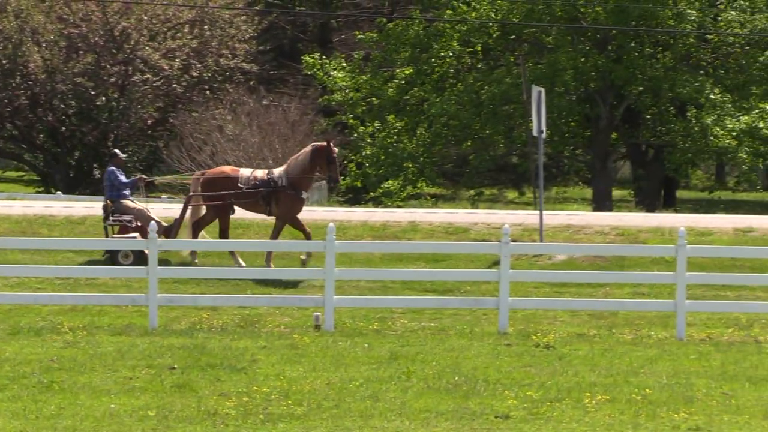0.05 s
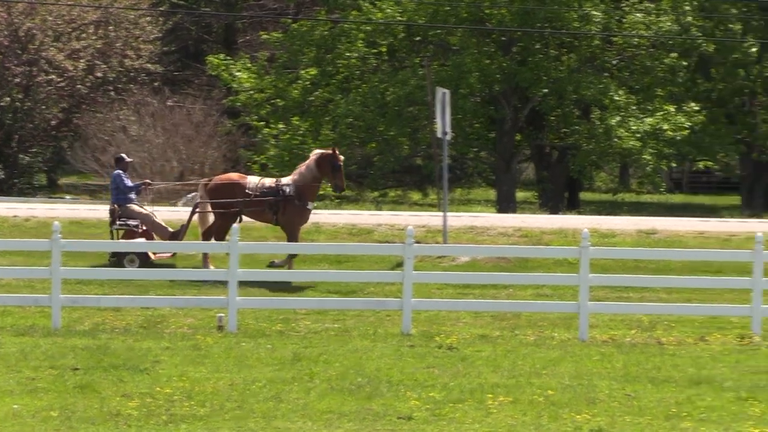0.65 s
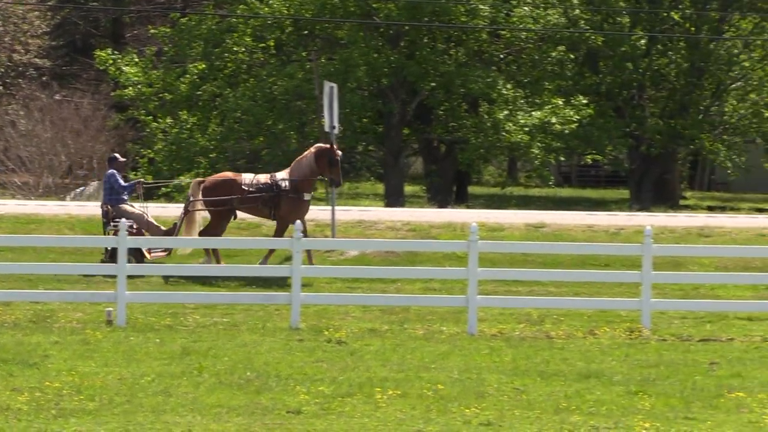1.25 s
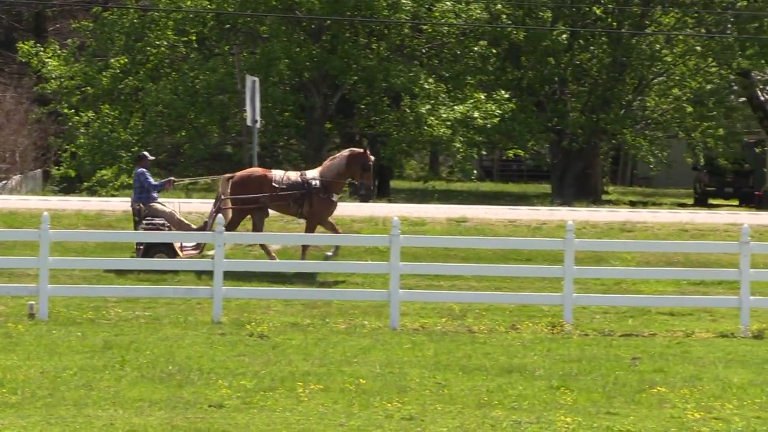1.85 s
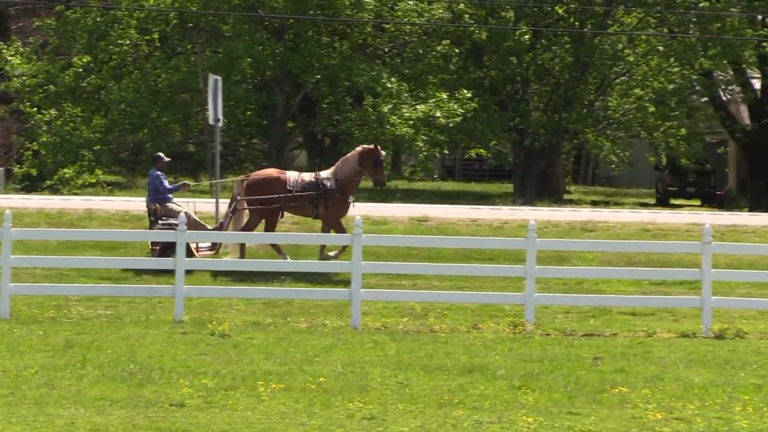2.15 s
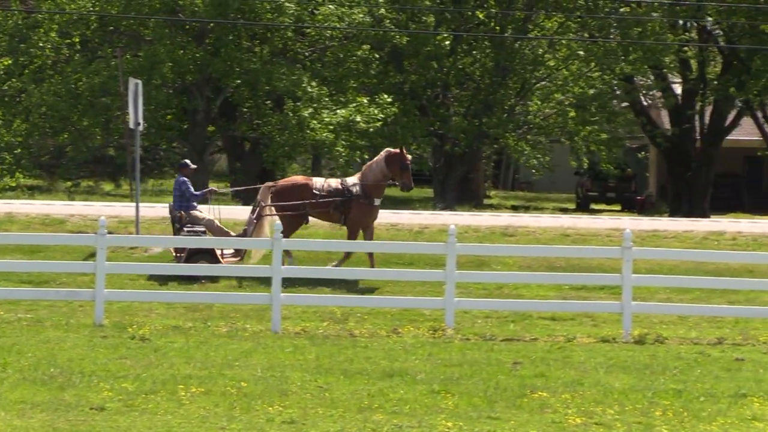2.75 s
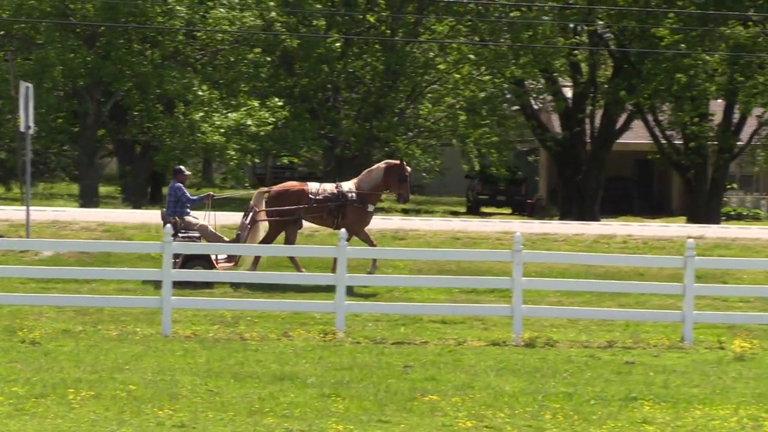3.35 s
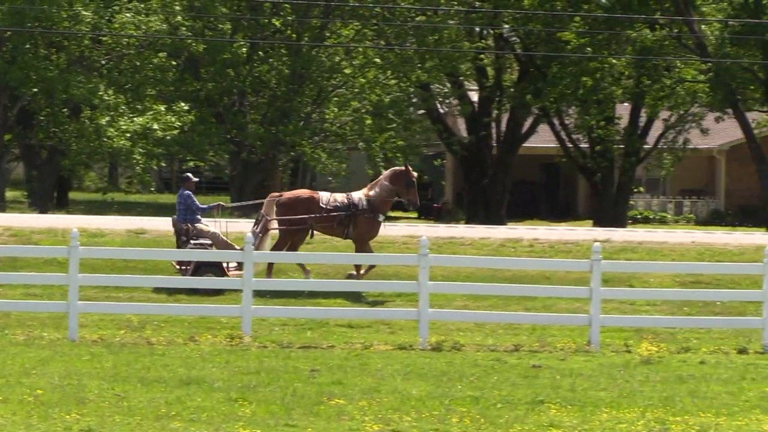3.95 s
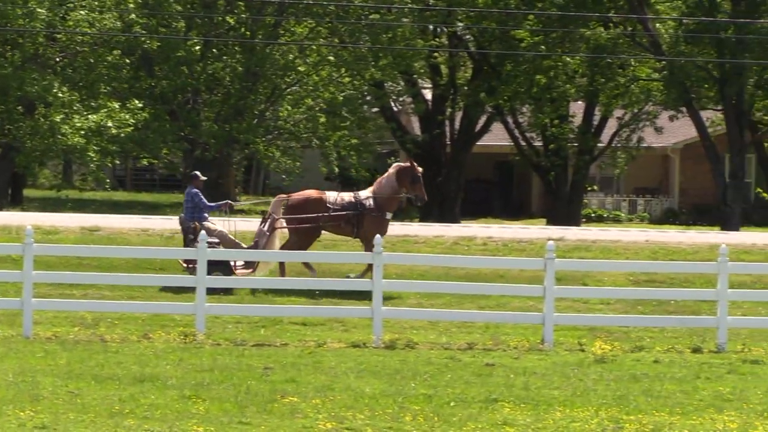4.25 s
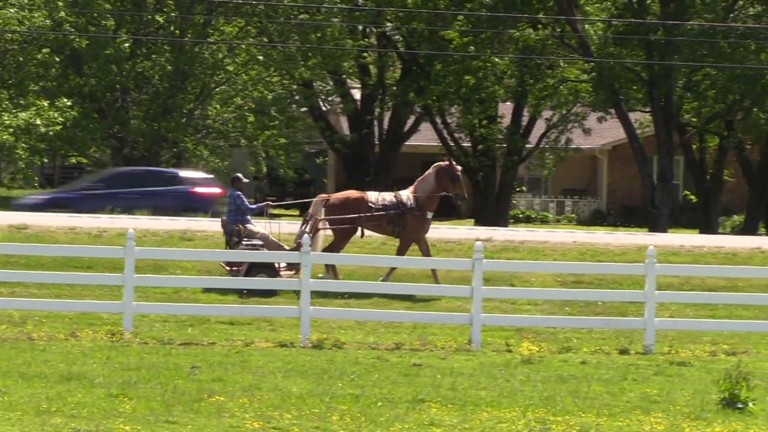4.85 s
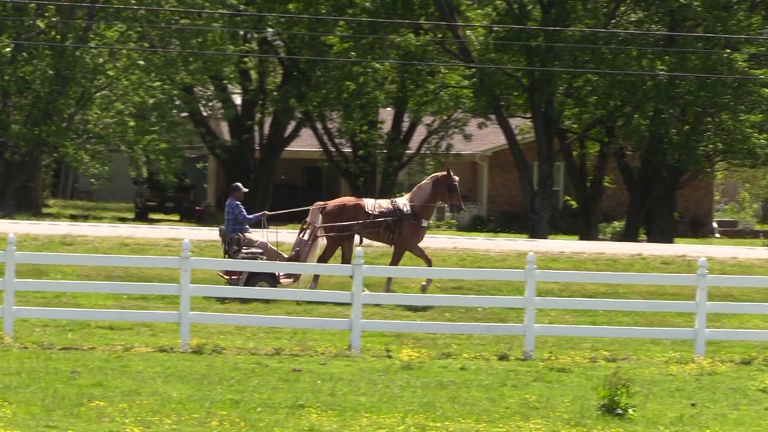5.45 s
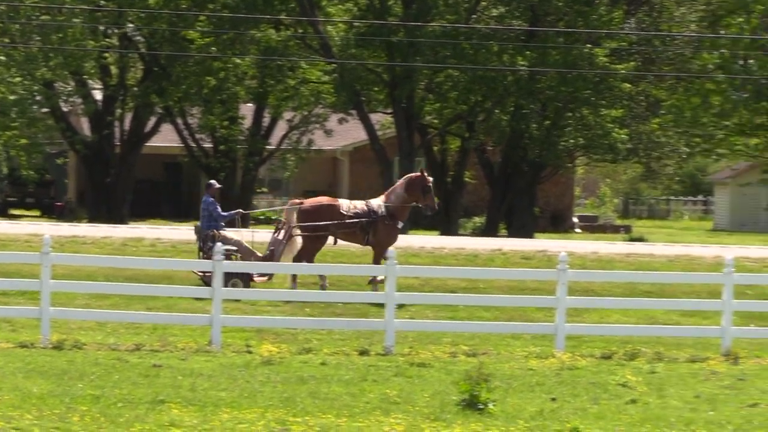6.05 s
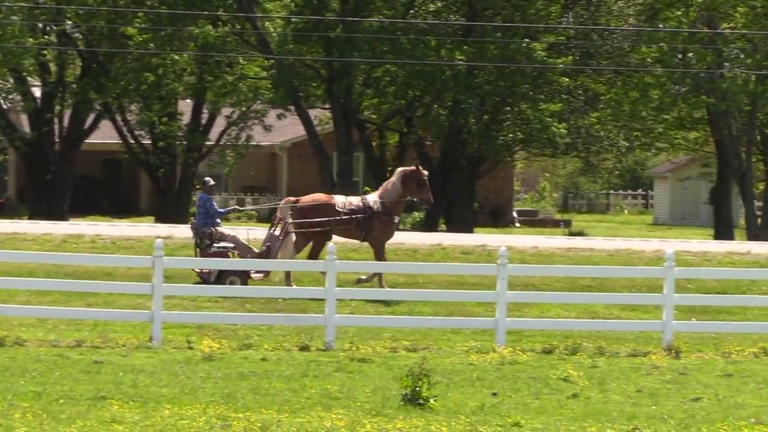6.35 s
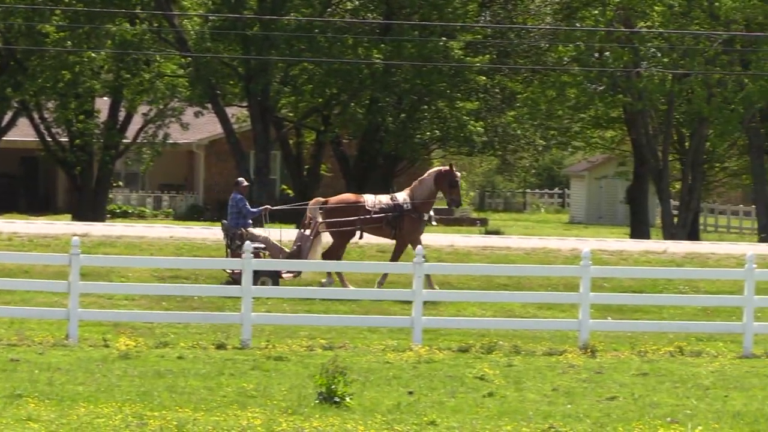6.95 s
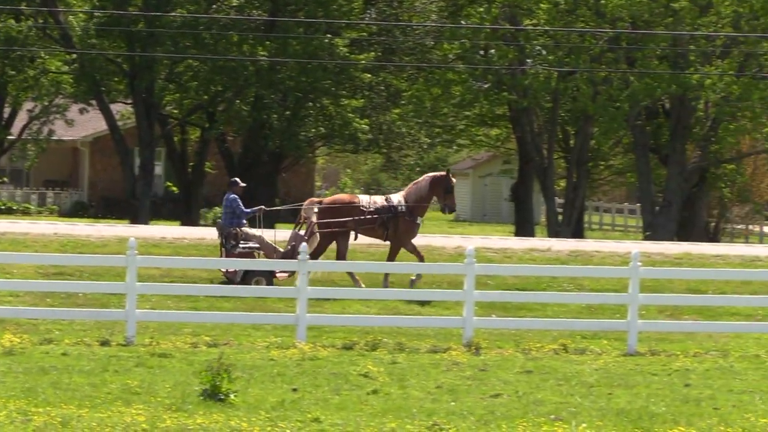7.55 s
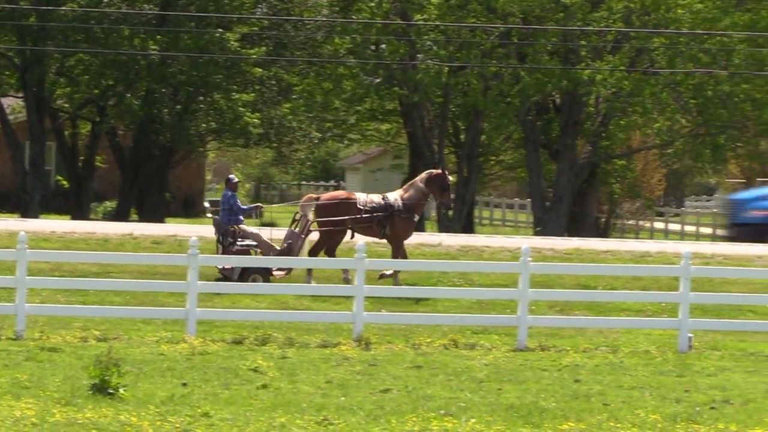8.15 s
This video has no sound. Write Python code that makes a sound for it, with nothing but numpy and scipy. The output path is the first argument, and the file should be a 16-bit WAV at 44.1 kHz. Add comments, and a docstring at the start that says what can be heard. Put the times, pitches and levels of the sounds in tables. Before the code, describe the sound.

Gusty wind rumbles on the microphone in a roadside field for about eight seconds, rising and falling unevenly. Sharp little slaps of air come at the very start and around 0.6 seconds. The strongest gusts sputter and crackle between 2.6 and 4 seconds, with a dry snap near 3.1, and further gusts push in around 6.5 and 7.9 seconds. Cars pass on a road some way off: their tyre roar swells most from 3.3 to 4 seconds, returns around 5.5 to 6.5, and rises again near the end, over a low engine drone that slowly grows. A small bird on the left gives a quick two-part whistled chirp at about 0.5, 2.2 and 3.6 seconds, then repeats it a little more than once a second. Faint thin far calls and scattered dry ticks lie over a soft, steady hiss of distant leaves.

```python
"""Gusty wind on a stereo microphone in a roadside field: eddies make a low rumble, and the strongest
gusts sputter and slap. Cars pass on a road some way off, their tyre roar swelling and fading over
the drone of far engines. A small bird to the left repeats a quick two-part chirp of whistled notes.
Thin far calls and dry ticks lie over a steady hiss of distant leaves and the microphone itself."""
import sys
import numpy as np
from scipy import signal
from scipy.fft import rfft, irfft
from scipy.io import wavfile
from scipy.ndimage import uniform_filter1d

SR = 44100
rng = np.random.default_rng(int(sys.argv[2]) if len(sys.argv) > 2 else 0)


def digitize_waveform(pressure):
    """Quantize a signal to 16-bit integers and store it at the path in sys.argv[1].

    Rows of a 2-D input are taken as channels; values are limited to [-1, 1].
    """
    field = np.atleast_2d(pressure).T
    bounded = np.clip(field, -1, 1)
    quanta = np.round(bounded * 32767).astype(np.int16)
    wavfile.write(sys.argv[1], SR, quanta)


N = 362502
FRAME, HOP = 1024, 256  # samples
BINS = np.fft.rfftfreq(FRAME, 1 / SR)
FRAME_TIMES = np.arange(N // HOP + 2) * HOP / SR
TIMES = np.arange(N) / SR

# far leaves and microphone hiss: frequency_hz, density_db
HISS_SPECTRUM = [(500, -2.5), (3000, 5), (4500, 6), (5600, 0.5), (7500, -3), (10000, -8), (13400, -13)]
# dips in the background after two hard gusts: deepest_s, gain_db, sink_s, recovery_s
BACKGROUND_DIPS = [(3.25, -3, 0.19, 0.33), (4.0, -3, 0.16, 0.43)]
# dry ticks and snaps, and one sharp click in the gust's sputter at 3.117 s: start_s, level_db, centre_hz,
# decay_s
DRY_TICKS = [(.066, -36.5, 2660, 0.012), (.276, -55, 5000, .006), (.278, -63, 8100, .012),
             (0.8455, -47, 5000, .0012), (2.085, -62, 7500, .025), (2.505, -60, 7000, .014),
             (3.117, -29, 3100, 0.0032), (3.2272, -61, 8000, .005), (5.5574, -45, 5000, 0.0014),
             (5.64, -60, 7500, .005), (6.9098, -49, 5000, .0015), (7.2196, -56, 5200, .007),
             (7.6327, -49, 5200, .0012), (8.0517, -46, 5100, .0012)]
# thin calls from far off: start_s, length_s, pitch_hz, level_db, mid_sag_ratio
FAR_CALLS = [(0.18, .028, 7750, -65, .005), (.875, .085, 4300, -58, .033), (4.245, .06, 6460, -64, .003),
             (4.35, .05, 6480, -68, .003), (4.56, 0.21, 4300, -65, 0.012)]
# notes of the bird's two chirps: delay_s, length_s, first_hz, middle_hz, last_hz, gain_db, trill_depth_hz
SLUR = [(-.013, 0.0075, 5450, 5640, 5450, -10, 0), (0, 0.0238, 4310, 4220, 3790, -1, 0),
        (0.024, 0.015, 3250, 3620, 3920, -4, 0), (0.05, .026, 3450, 3750, 4450, 0, 0),
        (.072, 0.0295, 3440, 3225, 3150, 3, 0)]
WARBLE = [(-.002, .016, 3600, 4200, 4350, -3, 0), (.013, 0.02, 4450, 4270, 4230, 2.5, 422.5),
          (.036, 0.0216, 3130, 3600, 4050, 1, 0), (.056, .03, 3950, 3550, 2950, 6.5, 389)]
# chirps from the left: start_s, level_db, pitch_ratio, notes
BIRD_CHIRPS = [(.466, -46, 1.02, SLUR), (2.211, -45.5, 0.97, SLUR), (3.583, -44, 1.0, SLUR),
               (4.305, -43.5, 0.96, SLUR), (5.157, -45, 0.96, WARBLE), (5.877, -40.5, 0.99, SLUR),
               (6.646, -47.5, 1.0, SLUR), (7.493, -44.5, 0.95, WARBLE), (8.165, -40, 0.95, SLUR)]
# far engines: frequency_hz, density_db
ENGINE_SPECTRUM = [(20, -65), (40, -32), (62, -21), (90, -8.5), (180, 5), (300, -7.5), (450, -8.5),
                   (750, -7.5), (1100, -11), (2500, -49)]
# tyre roar as it reaches the field: frequency_hz, density_db
TYRE_SPECTRUM = [(300, -31), (520, -6.5), (750, -2.5), (1050, -3), (1270, 0), (1450, -3), (1720, -0.5),
                 (2150, -4), (2750, -6), (3300, -14), (3900, -20.5), (5500, -49.5)]
# how alike the road sounds at the microphone's two ports: frequency_hz, correlation_ratio
ROAD_LIKENESS = [(600, 0.99), (1000, 0.97), (1500, 0.93), (2800, 0.88), (4000, 0.97), (6000, 0.33)]
# the road's balance between the ports: frequency_hz, left_minus_right_db
ROAD_BALANCE = [(650, -1), (900, -1), (1350, -5), (1700, -3), (2400, -0.3), (2900, -2), (3400, -4),
                (4000, -6), (5000, -3)]
# the road's phase between the ports: frequency_hz, left_lead_rad
ROAD_PHASE = [(550, 0), (900, 0.33), (1300, 0.25), (1550, 0.47), (2300, 0.33), (3300, -0.28), (3800, 2.1),
              (4500, 2)]
# swells of tyre roar from passing cars, each with a tread peak and a band coloured by the ground echo:
# peak_s, level_db, half_power_s, tread_hz, tread_db, ground_hz, ground_db
TYRE_SWELLS = [(.76, -43, 2.1, 1600, 2, 503, 6.5), (2.55, -42, 0.24, 1640, 11, 550, -2),
               (3.42, -34, 0.43, 1940, 4.5, 650, -2.5), (3.8, -32.5, 0.11, 1920, 6.5, 710, -7),
               (4.6, -47, 0.24, 1770, -8, 510, -11), (5.64, -36.5, 0.44, 1620, 7, 600, -3),
               (5.97, -36.6, 0.18, 2580, 12.5, 630, -21), (6.52, -38.5, 0.49, 1215, 3.5, 450, -7),
               (7.71, -39.5, 0.35, 1330, 2.5, 392, -18), (8.12, -39, 0.11, 2400, 11, 370, -15)]
# sputter in the strongest gusts: middle_s, level_db, half_length_s
SPUTTER_BURSTS = [(0.047, -44, .03), (2.611, -39.5, .006), (2.862, -38, 0.036), (2.997, -39, 0.066),
                  (3.11, -34.5, 0.027), (3.806, -40, 0.023), (3.915, -37.5, 0.023), (6.59, -52, .03),
                  (7.867, -51, 0.055)]
# slaps of air on the microphone: start_s, peak_db, centre_hz
AIR_SLAPS = [(.0107, -28, 2100), (.0318, -20, 1850), (.5465, -27, 1900), (.5935, -23, 780),
             (2.6243, -27.5, 2300), (3.9122, -25, 2100)]
# wind rumble at the microphone: frequency_hz, density_db
RUMBLE_SPECTRUM = [(20, -87), (40, -52), (62, -42), (100, -20.5), (140, 0), (185, -0.5), (270, -1),
                   (350, -5), (430, -10), (540, -19), (700, -26), (1000, -30.5), (1600, -44), (3000, -91)]
# gusts reaching the microphone: peak_s, level_db, rise_s, fall_s, brightness_db
WIND_GUSTS = [(.03, -27, 0.12, 0.15, 1), (.3, -29, 0.054, .03, -2), (.55, -26, 0.21, 0.24, 1),
              (.76, -30, 0.034, 0.065, 2.5), (.97, -35, 0.15, .2, 1), (1.17, -30.5, 0.075, .05, 1),
              (1.39, -30, 0.17, 0.25, 1.5), (1.89, -31, 0.17, .2, -0.5), (2.2, -29.5, 0.098, 0.036, 1.5),
              (2.34, -32.9, 0.086, 0.044, 0.5), (2.6, -26.5, 0.054, .15, 1), (2.83, -24, 0.05, 0.095, -.5),
              (3.09, -24.5, 0.21, 0.12, 1), (3.61, -31.5, 0.33, .18, 2), (3.88, -24.5, 0.2, .18, 2.5),
              (4.17, -27.5, 0.059, 0.083, -1), (4.42, -34.5, 0.15, 0.26, 0.5), (4.73, -39, 0.068, .05, 0),
              (5.05, -34, 0.038, .03, -3), (5.24, -28, 0.097, 0.043, -1), (5.4, -30.5, 0.063, 0.21, -1),
              (5.68, -33.5, .15, 0.032, -3.5), (5.87, -33.5, 0.13, 0.2, -5), (6.19, -30, 0.016, .07, -3.5),
              (6.33, -32, 0.027, .06, 2.5), (6.52, -26, 0.083, 0.13, -1.5), (6.585, -24, 0.029, 0.023, 0.5),
              (6.86, -36.5, .26, 0.026, 2), (7.03, -42, 0.053, 0.15, -2), (7.5, -29.5, 0.18, 0.11, 0),
              (7.68, -31.5, 0.084, 0.019, -5), (7.85, -24.5, 0.016, 0.026, 1.5), (7.89, -28, 0.13, .13, -1)]


def gain_of(db):
    """Decibels to amplitude."""
    return 10 ** (np.asarray(db) / 20)


def unit_rms(x):
    """Scales to rms 1."""
    return x / np.sqrt(np.mean(x ** 2) + 1e-20)


def on_bins(points):
    """Spreads a frequency table over the bins."""
    hz, value = np.transpose(points)
    return np.interp(np.log(BINS + 1), np.log(hz + 1), value)


def bell(hz, octaves):
    """A bell curve of height 1 on the bins."""
    return np.exp(-(np.log2((BINS + 1) / hz) / octaves) ** 2)


def add(mix, start_s, sound):
    """Mixes a sound in at a time."""
    part = mix[max(round(start_s * SR), 0):][:len(sound)]
    part += sound[:len(part)]


def band(x, low_hz, high_hz, order=2):
    """Band-pass filter."""
    return signal.sosfilt(signal.butter(order, [low_hz, high_hz], "band", fs=SR, output="sos"), x)


def random_spectra():
    """Short-time spectra of white noise, frames x bins."""
    shape = len(FRAME_TIMES), len(BINS)
    return rng.standard_normal(shape) + 1j * rng.standard_normal(shape)


def patches(size):
    """Smooth random blotches over time and frequency."""
    slow = uniform_filter1d(random_spectra().real, size, axis=0)
    return unit_rms(uniform_filter1d(slow, size, axis=1))


def port_pair(likeness):
    """Partly alike noise spectra at the microphone's two ports."""
    left = random_spectra()
    return np.array([left, likeness * left + np.sqrt(1 - likeness ** 2) * random_spectra()])


def coloured(spectra, colour_db):
    """Noise of steady power 1 whose colour may move."""
    colour = gain_of(colour_db)
    colour = colour / np.linalg.norm(colour, axis=-1, keepdims=True)
    _, noise = signal.istft(np.swapaxes(spectra * colour, -1, -2), nperseg=FRAME, noverlap=FRAME - HOP)
    return unit_rms(noise[..., :N])


def hiss(level_db=-58, lean_db=0.45):
    """Far leaves and the microphone make a smooth hiss, a touch louder on the left."""
    noise = coloured(port_pair(likeness=0.33), on_bins(HISS_SPECTRUM) + 1.2 * patches(size=8))
    return gain_of(level_db) * noise * gain_of([[lean_db], [-lean_db]])


def background_dips():
    """A gain that sinks briefly and recovers."""
    return gain_of(sum(db * np.interp(TIMES - deepest_s, [-sink_s, 0, recovery_s], [0, 1, 0])
                       for deepest_s, db, sink_s, recovery_s in BACKGROUND_DIPS))


def ticks(width_ratio=1.13):
    """Small dry snaps, each a dying burst of noise round one pitch."""
    out, t = np.zeros(N), np.arange(SR // 10) / SR
    for start_s, db, hz, decay_s in DRY_TICKS:
        fade = np.exp(-t / decay_s)
        burst = band(rng.standard_normal(len(t)) * fade, hz / width_ratio, hz * width_ratio, order=3)
        add(out, start_s, gain_of(db) * burst * np.linalg.norm(fade) / np.linalg.norm(burst))
    return out


def tree_echo(x, t60_s=0.16, echoes_per_s=2000):
    """Trunks and leaves scatter a thin tail, different in each channel."""
    t = np.arange(SR // 2) / SR
    taps = rng.standard_normal((2, len(t))) * (rng.random((2, len(t))) < echoes_per_s / SR)
    tail = taps * gain_of(-60 * t / t60_s) * (t > .004)
    return signal.fftconvolve(x[None], tail / np.linalg.norm(tail[0]), axes=1)[:, :N]


def far_calls():
    """Distant birds give thin whistles that sag in pitch midway."""
    out = np.zeros(N)
    for start_s, length_s, hz, db, sag in FAR_CALLS:
        arch = np.sin(np.linspace(0, np.pi, round(length_s * SR)))
        phase = 2 * np.pi * np.cumsum(hz * (1 - sag * arch)) / SR
        add(out, start_s, gain_of(db) * np.sqrt(abs(arch)) * np.sin(phase))
    return out


def bird_note(length_s, bend_hz, trill_depth_hz, pitch_ratio, trill_rate_hz=79, fade_db_per_hz=0.0025):
    """A near-pure whistle that bends through three pitches, may trill, and weakens as it rises."""
    t = np.arange(0, length_s, 1 / SR)
    progress = t / length_s
    hz = np.polyval(np.polyfit([0, .5, 1], bend_hz, 2), progress)
    hz += trill_depth_hz * np.cos(2 * np.pi * trill_rate_hz * t)
    envelope = np.sqrt(np.sin(np.pi * progress)) * gain_of(-fade_db_per_hz * (hz - hz.mean()))
    waver = 1 + 0.024 * unit_rms(uniform_filter1d(rng.standard_normal(len(t)), size=90))
    return envelope * np.sin(2 * np.pi * np.cumsum(pitch_ratio * hz * waver) / SR)


def birds(echo_db=-6, lean_db=2.0):
    """A bird to the left strings notes into chirps; these and the far calls echo off the trees."""
    song, far = np.zeros(N), far_calls()
    for start_s, db, pitch_ratio, notes in BIRD_CHIRPS:
        for delay_s, length_s, *bend_hz, note_db, trill_depth_hz in notes:
            note = bird_note(length_s, bend_hz, trill_depth_hz, pitch_ratio)
            add(song, start_s + delay_s, gain_of(db + note_db) * note)
    right = np.concatenate([np.zeros(3), song])[:N]  # reaches the right port 3 samples later
    direct = np.array([song, right]) * gain_of([[lean_db], [-lean_db]])
    return direct + far + gain_of(echo_db) * tree_echo(song + far)


def far_engines(start_db=-49.5, nearing_db_per_s=0.78):
    """Engines drone far down the road, growing as they draw nearer."""
    drone = coloured(random_spectra(), on_bins(ENGINE_SPECTRUM))
    return gain_of(start_db + nearing_db_per_s * TIMES) * drone


def tyre_roar(gain_db=0.5, patchy_db=0.73):
    """Tyre roar from the road swells and fades with the inverse square of distance."""
    power = 0
    for peak_s, db, half_power_s, tread_hz, tread_db, ground_hz, ground_db in TYRE_SWELLS:
        tread = tread_db * bell(tread_hz, octaves=0.43)
        ground = ground_db * bell(ground_hz, octaves=0.46)
        colour = gain_of(on_bins(TYRE_SPECTRUM) + tread + ground) ** 2
        swell = gain_of(db) ** 2 / (1 + ((FRAME_TIMES - peak_s) / half_power_s) ** 2)
        power = power + np.outer(swell, colour / colour.sum())
    to_left = gain_of(on_bins(ROAD_BALANCE) / 2) * np.exp(1j * on_bins(ROAD_PHASE) / 2)
    ports = port_pair(on_bins(ROAD_LIKENESS)) * np.array([to_left, 1 / to_left])[:, None]
    roar = coloured(ports, 10 * np.log10(power) + patchy_db * patches(size=12))
    envelope = np.interp(TIMES, FRAME_TIMES, np.sqrt(power.sum(1)))
    return gain_of(gain_db) * envelope * roar


def wind_sputter(pops_per_s=1200, spread_db=5.5, rasp_hz=32, rasp_db=6.5):
    """Hard gusts break up on the microphone into rasps of tiny pops, a few dozen rasps a second."""
    pops = (rng.random(N) < pops_per_s / SR) * rng.choice([-1, 1], N)
    pops = pops * gain_of(spread_db * np.minimum(rng.exponential(1, N), 2.5))
    pulsing = band(rng.standard_normal(N), rasp_hz / 1.46, rasp_hz * 1.54)
    rasps = gain_of(rasp_db * np.cos(np.angle(signal.hilbert(pulsing))))  # uneven pace, even depth
    bursts = sum(gain_of(db) / (1 + ((TIMES - middle_s) / half_length_s) ** 4)
                 for middle_s, db, half_length_s in SPUTTER_BURSTS)
    return bursts * unit_rms(band(pops * rasps, low_hz=1000, high_hz=3200, order=4))


def air_slaps(width_ratio=1.62):
    """Air slaps the microphone: sharp pulses that die within a few cycles."""
    out = np.zeros(N)
    for start_s, db, hz in AIR_SLAPS:
        slap = band(signal.unit_impulse(SR // 50), hz / width_ratio, hz * width_ratio, order=5)
        add(out, start_s, gain_of(db) * slap / abs(slap).max())
    return out


def gusts(calm_db=-47.5):
    """Gusts swell, die away and add up over a light breeze; gives force and brightness in dB."""
    peak_s, db, rise_s, fall_s, bright_db = np.transpose(WIND_GUSTS)[:, :, None]
    from_peak = (FRAME_TIMES - peak_s) / np.where(FRAME_TIMES < peak_s, rise_s, fall_s)
    power = gain_of(db) ** 2 / (1 + from_peak ** 2 / 2) ** 4
    total = power.sum(0) + gain_of(calm_db) ** 2
    return 10 * np.log10(total), (power * bright_db).sum(0) / total


def wind_rumble(gain_db=0.21, usual_db=-31, knee_hz=340, octaves_per_db=0.013):
    """Eddies rumble right at the microphone; faster air makes smaller eddies and a higher rumble."""
    force_db, bright_db = gusts()
    excess_db = force_db - usual_db
    shift = 2 ** (octaves_per_db * excess_db)
    colour_db = np.interp(BINS / shift[:, None], BINS, on_bins(RUMBLE_SPECTRUM))
    upper_band = np.clip(np.log2((BINS + 1) / knee_hz) + .5, 0, 1.1)
    tilt_db = 2.0 + 1.7 * bright_db + 0.23 * excess_db
    air = coloured(random_spectra(), colour_db + np.outer(tilt_db, upper_band))
    air = air / np.sqrt(uniform_filter1d(air ** 2, size=2600))  # a gust's force holds over many eddies
    flutter_db = 0.9 * unit_rms(band(rng.standard_normal(N), 32.7, 39.6))
    surge_db = unit_rms(band(rng.standard_normal(N), 6.1, 15.8))  # small surges within the gusts
    force = gain_of(np.interp(TIMES, FRAME_TIMES, force_db) + gain_db)
    return force * unit_rms(air * gain_of(flutter_db + surge_db))


def scene():
    """Wind on the microphone, alike in both channels, with the road and the field beyond."""
    wind = wind_rumble() + wind_sputter() + air_slaps()
    background = tyre_roar() + far_engines() + hiss()
    return wind + background_dips() * background + birds() + ticks()


def record(dry, low_cut_hz=58, mono_hz=520, top_hz=13580):
    """The recorder's wind filter cuts deep bass and folds the rest of it to mono; the top is cut too."""
    dry = signal.sosfilt(signal.butter(2, low_cut_hz, "high", fs=SR, output="sos"), dry)
    mid, side = (dry[0] + dry[1]) / 2, (dry[0] - dry[1]) / 2
    slope = (np.fft.rfftfreq(N, 1 / SR) / mono_hz) ** 6
    side = irfft(rfft(side) * slope / (1 + slope), N)
    low_pass = signal.firwin(511, top_hz, window=("kaiser", 9), fs=SR)
    return signal.oaconvolve(np.array([mid + side, mid - side]), low_pass[None], "same")


dry = scene()
out = record(dry)
digitize_waveform(out)
```